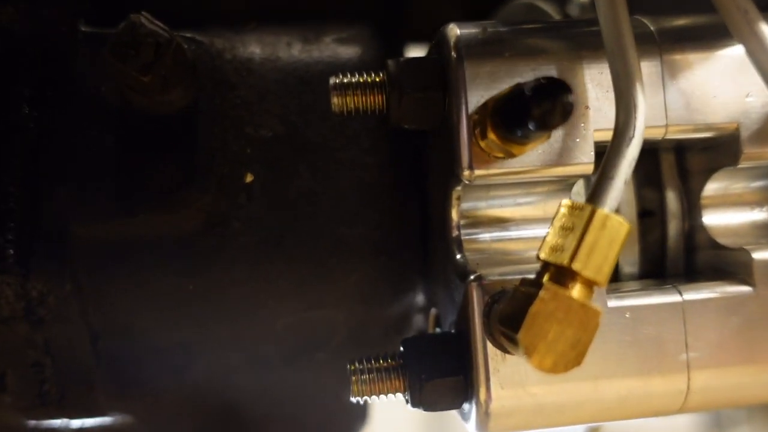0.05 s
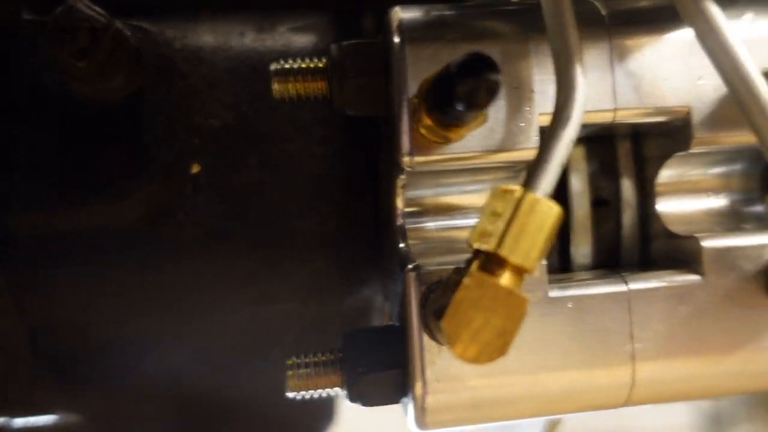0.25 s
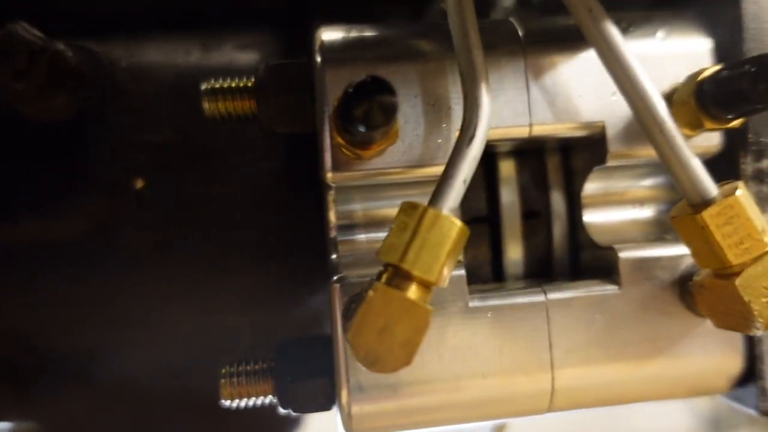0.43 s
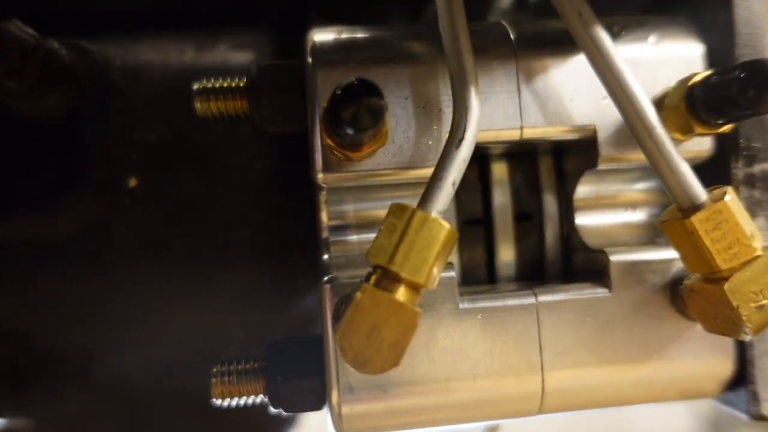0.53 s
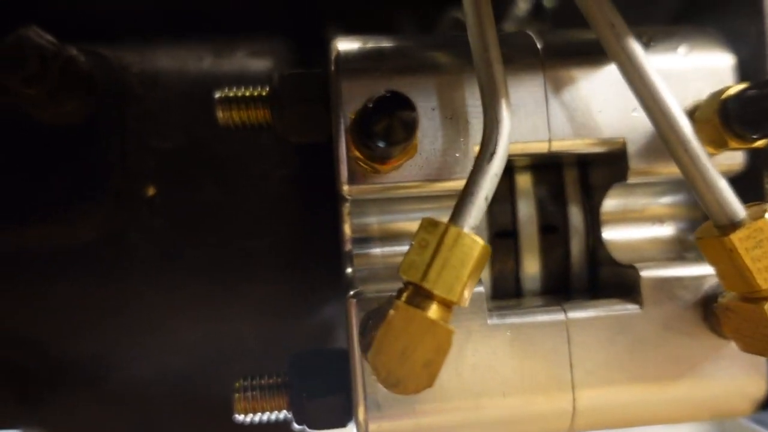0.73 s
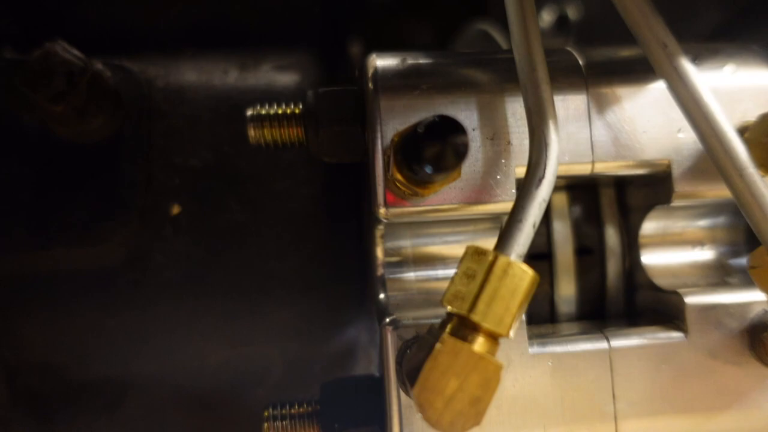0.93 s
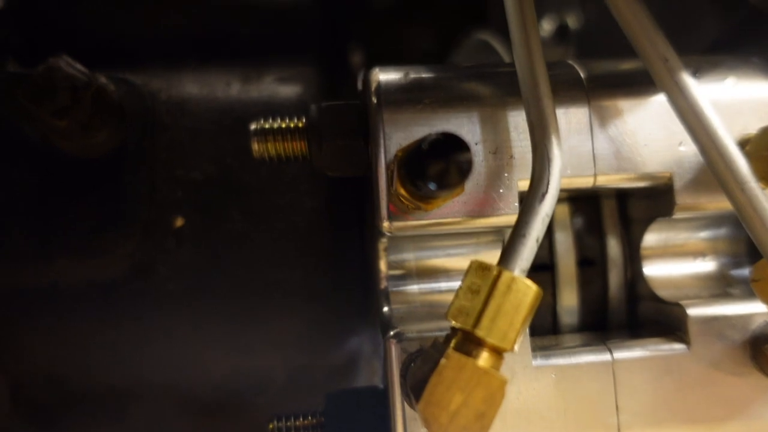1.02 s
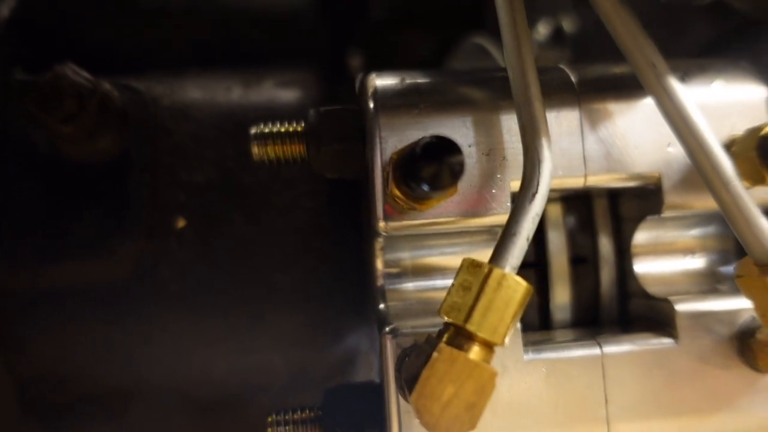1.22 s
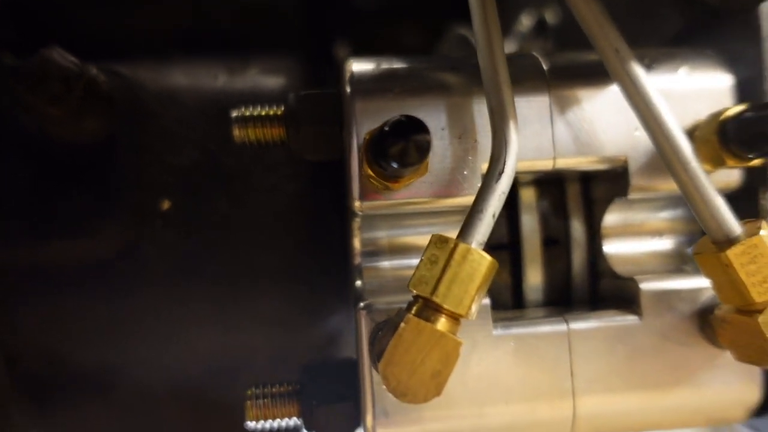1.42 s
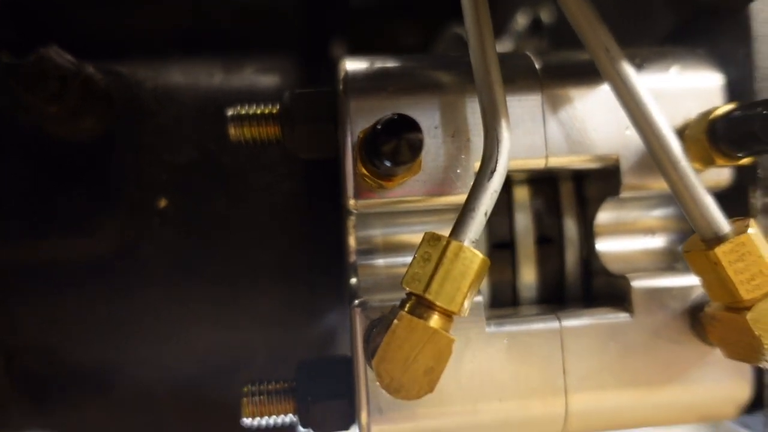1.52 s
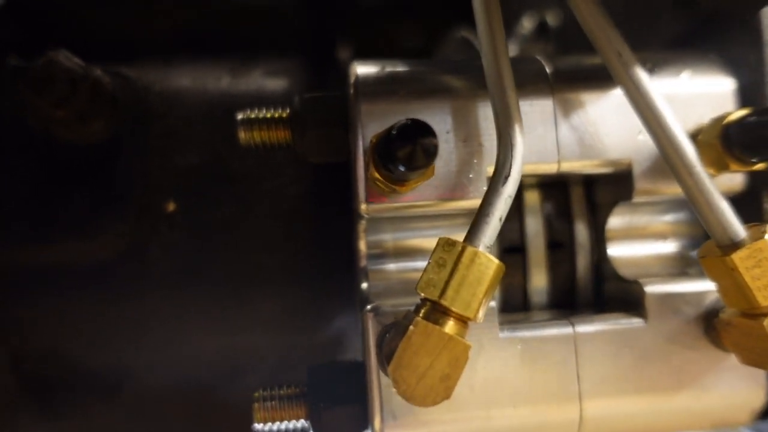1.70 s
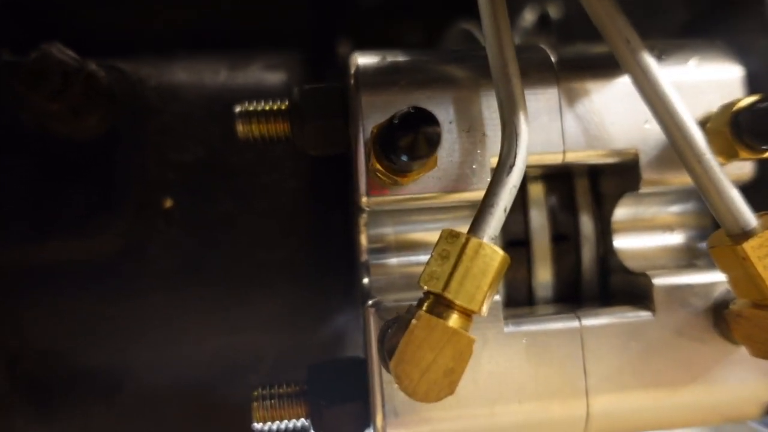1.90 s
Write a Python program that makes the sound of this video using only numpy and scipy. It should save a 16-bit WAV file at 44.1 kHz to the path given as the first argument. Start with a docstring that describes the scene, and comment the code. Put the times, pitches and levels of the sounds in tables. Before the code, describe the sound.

Close to the caliper, a disc brake grips and lets go twice. The pads clack on with a brief metallic ring, then release with a bright click, another clack and soft knocks, over faint workshop air.

```python
"""A disc brake is worked twice in a workshop, heard close to the caliper (the part that holds the pads).
Over quiet air and a thin whine, the pistons slide out with a faint hiss and small ticks.
The pads clack onto the disc and make the metal ring. On letting go a catch snaps,
the mechanism drops back on its stop, the mount shudders and the linkage settles with soft knocks.
The loose pads rattle briefly after this first release; the second round has no rattle."""
import sys
import numpy as np
from scipy import signal
from scipy.fft import rfft, irfft, next_fast_len
from scipy.io import wavfile

SR = 44100
rng = np.random.default_rng(int(sys.argv[2]) if len(sys.argv) > 2 else 0)


def materialize(psi):
    """Save the field psi as 16-bit PCM at rate SR to the path in sys.argv[1].

    A 1-D psi becomes a single channel; in a 2-D psi each row is a channel.
    """
    bounded = np.clip(np.atleast_2d(psi).T, -1, 1)
    quanta = np.round(bounded * 32767).astype(np.int16)
    wavfile.write(sys.argv[1], SR, quanta)


N = 85995

# A "colour" says how strong a noise is at each frequency; "t60" is the time a sound takes to fall 60 dB.
# how alike the two ears hear a noise: f/Hz, likeness (1 = the same)
EAR_LIKENESS = [(300, 0.98), (1000, 0.88), (5000, 0.69)]
# how long the workshop echoes: f/Hz, t60/s
ROOM_DECAY = [(1000, 1), (2500, 0.78), (9000, 0.85), (15000, 0.96)]
# colour of the workshop air: f/Hz, level/dB
AIR_COLOUR = [(25, -46), (100, -35), (193, -31.5), (368, -10.5), (666, -10.5), (848, -8), (1140, -8),
              (1300, -5.5), (1850, -15), (7500, -28), (15500, -56.5)]
# the pistons slide: start/s, end/s, level/dB
PISTON_SLIDES = [(0.087, 0.314, -53), (1.093, 1.193, -54.5), (1.704, 1.742, -55)]
# colour of their hiss: f/Hz, level/dB
HISS_COLOUR = [(400, -14), (900, 7.5), (1850, 6.5), (2500, -4), (3500, -10), (4800, -2), (8000, -18),
               (15000, -51)]
# small ticks of pads and springs: t/s, level/dB, f/Hz
SMALL_TICKS = [(0.16, -46.5, 4160), (0.177, -42.5, 4380), (0.19, -42, 4480), (0.221, -40.5, 4890),
               (0.487, -46, 4600), (0.583, -39.5, 5430), (0.639, -49, 5540), (0.843, -37.5, 1860),
               (1.0953, -46, 4240), (1.115, -51, 4700), (1.123, -44, 5420), (1.4139, -35.5, 2630),
               (1.517, -39, 5270), (1.67, -41.5, 3190)]
# colour of a tiny slip: f/Hz, level/dB
SLIP_COLOUR = [(400, -23), (1500, -2), (5000, 11.5), (8500, 0.5), (10500, -1), (15000, -18)]
# the pads meet the disc: t/s, gap between contacts/s, level/dB, noise t60/s, favoured f/Hz
PAD_CLAMPS = [(0.295, 0.0065, -28, 0.077, 1090), (1.2241, 0.0076, -31, 0.17, 1190)]
# each clamp is a dull touch, the hard clack and a last seating blow: level/dB, brightness/Hz
PAD_CONTACTS = [(-1, 5200), (1, 19000), (-3.5, 6900)]
# the modes (natural ringing tones) of caliper and disc: f/Hz, level/dB, t60/s
CALIPER_MODES = [(382, -21, 0.74), (534, -7.5, 0.155), (958, -9, 0.32), (1017, -6, .27), (1177, -13, 0.18),
                 (1355, -9.5, 0.11), (1630, -8, 0.092), (1954, -9.5, 0.15), (2202, -14, 0.16),
                 (2530, -13, 0.075), (2753, -7.5, 0.12), (3210, -8.5, 0.085), (4143, -10, 0.18),
                 (5244, -5, 0.055)]
# colour of the pads' clack: f/Hz, level/dB
PAD_COLOUR = [(200, -13), (400, -7), (750, -5), (1100, 3), (2700, -4), (5400, -6), (7500, -15),
              (10000, -26), (15000, -34.5)]
# soft knocks of the linkage: t/s, level/dB, t60/s, brightness/Hz
LINKAGE_KNOCKS = [(0.4851, -37, 0.062, 7000), (0.74, -42, 0.12, 2500), (0.872, -47, 0.068, 2530),
                  (1.431, -39.5, 0.062, 4950), (1.573, -32.5, 0.076, 610), (1.609, -39.5, 0.099, 550),
                  (1.673, -39, 0.085, 2970), (1.683, -40.5, 0.12, 700)]
# colour of a knock: f/Hz, level/dB
LINKAGE_COLOUR = [(200, -24), (440, 2), (620, -4), (990, -1.5), (1400, -3), (1900, -17), (5500, -11.5),
                  (15000, -64)]
# the catch snaps: t/s, level/dB
CATCH_SNAPS = [(0.5645, -25.5), (1.4983, -25.5)]
# modes of the catch: f/Hz, level/dB, t60/s
CATCH_MODES = [(2540, -4, 0.0035), (2860, -11, 0.0097), (4020, 3, 0.009), (4894, 3.5, 0.02),
               (5100, 6.5, 0.012), (7480, -15.5, 0.043)]
# colour of the snap: f/Hz, level/dB
CATCH_COLOUR = [(300, -17), (1200, 2), (2500, 4), (4800, 2.5), (7500, 0), (10000, -22), (15000, -38)]
# the mechanism lands on its stop: t/s, level/dB, extra level of the ring/dB, brightness/Hz
STOP_LANDINGS = [(0.621, -26, 0.5, 3600), (0.625, -31, 8, 12700), (1.5484, -23.5, -26, 3380),
                 (1.551, -30.5, 9, 11100)]
# modes of the stop, the main one first: f/Hz, level/dB, t60/s
STOP_MODES = [(1262, 2, .068), (978, -15, .055), (1620, -9, .055), (1830, -8, .04), (2132, -12, .05),
              (2480, -11, .03), (2700, -4, .035), (3600, -11, .025), (6740, -30, .05)]
# colour of a landing: f/Hz, level/dB
LANDING_COLOUR = [(200, -34), (350, -18.5), (900, -20.5), (1700, -4.5), (2700, -5), (4000, -13),
                  (6500, -19), (15000, -35.5)]
# the mount shudders: t/s, level/dB
MOUNT_SHUDDERS = [(0.631, -48.5), (1.56, -45)]
# colour of the shudder: f/Hz, level/dB
MOUNT_COLOUR = [(60, -31), (160, -3), (260, -7.5), (380, 10), (600, -11), (4000, -40)]
# the loosened pads rattle: t/s, level/dB, t60/s
PAD_RATTLES = [(0.637, -34, 0.15)]

LOW_CUT_HZ, TOP_HZ = 284, 15750  # the bass stays weak below the first; the top of the sound's range
PAD_ECHO_DB = -4.5


def amp(db):
    """Turn decibels into a number to multiply by."""
    return 10 ** (np.asarray(db) / 20)


def along(points, hz):
    """Read between the rows of a (frequency, value) table, on a log frequency axis."""
    freqs, values = np.transpose(points)
    return np.interp(np.log(hz + 1), np.log(freqs + 1), values)


def filtered(x, response):
    """Scale each frequency in x by response(hz)."""
    size = next_fast_len(N + 8192)
    return irfft(rfft(x, size) * response(np.fft.rfftfreq(size, 1 / SR)), size)[..., :N]


def softened(x, hz):
    """A softer contact loses the treble above hz, its brightness."""
    return filtered(x, lambda f: 1 / (1 + np.sqrt(2) * 1j * f / hz - (f / hz) ** 2))


def thinned(x):
    """Weaken the bass below LOW_CUT_HZ."""
    return signal.sosfilt(signal.butter(2, LOW_CUT_HZ, "high", fs=SR, output="sos"), x)


def noise(colour):
    """Coloured stereo noise of strength (rms) 1, nearly the same in both ears in the bass."""
    def response(hz):
        spread = np.arccos(np.clip(along(EAR_LIKENESS, hz), -1, 1)) / 2
        return amp(along(colour, hz)) * [np.cos(spread), np.sin(spread)]
    mid, side = filtered(rng.standard_normal((2, N)), response)
    pair = np.array([mid + side, mid - side])
    return pair / pair.std()


def since(s):
    """Seconds since time s, zero before it."""
    return np.maximum(np.arange(N) / SR - s, 0)


def fade(t, t60, rise=0.00029):
    """A level that rises from zero, then dies away; all times are in seconds."""
    return np.exp(-np.log(1000) * t / t60) * (1 - np.exp(-t / rise))


def wander():
    """A random drift of phase, about 2.5 radians after one second, that makes a tone unsteady."""
    return 2.5 * np.cumsum(rng.standard_normal(N)) / np.sqrt(SR)


def ring(t, modes, rise=0, scatter_db=2, build_cycles=3.4):
    """Struck modes build up over a few cycles and fade; the loose contact detunes them at random."""
    out = 0
    for hz, db, t60 in modes:
        phase = 2 * np.pi * (hz * t + rng.random()) + wander()
        strength = amp(db + scatter_db * rng.standard_normal())  # no two blows are alike
        out = out + strength * fade(t, t60, rise + build_cycles / hz) * np.sin(phase)
    return out


def placed(x, pan_db, echo_db, near=0):
    """Add the room's echo of x and an echo-free ring (near), then thin the bass; pan_db > 0 is left."""
    hz, t, spectrum = signal.stft(noise([(SR, 0)])[:, :SR], SR, nperseg=256)  # white noise
    decay = fade(t, along(ROOM_DECAY, hz)[:, None], rise=0.0022)
    tail = signal.istft(spectrum * decay, SR, nperseg=256)[1]
    echo = signal.fftconvolve(x.mean(0)[None], tail / np.linalg.norm(tail[0]), axes=1)[:, :N]
    direct = (x + near) * amp([[pan_db / 2], [-pan_db / 2]])
    return thinned(direct + amp(echo_db) * echo)


def air(db=-56):
    """The quiet, even rush of the workshop air."""
    return amp(db) * noise(AIR_COLOUR)


def whine(hz=846, db=-67):
    """A thin, slightly unsteady tone in the background."""
    return amp(db) * np.sqrt(2) * np.sin(2 * np.pi * hz * since(0) + wander())


def slides(rise_s=0.0011, fall_s=0.041, slips_per_s=130, crackle_db=-13):
    """The pistons hiss while they travel, with a fine crackle of tiny slips."""
    level = sum(amp(db) * (1 - np.exp(-since(start) / rise_s)) * np.exp(-since(end) / fall_s)
                for start, end, db in PISTON_SLIDES)
    slips = (rng.random(N) < slips_per_s / SR) * rng.uniform(.5, 1, N)
    grains = signal.fftconvolve(slips, fade(since(0), t60=0.006))[:N]
    crackle = amp(crackle_db) * grains / grains.std() * noise(SLIP_COLOUR)
    return thinned(level * (noise(HISS_COLOUR) + crackle))


def ticks(ping_t60=0.03):
    """Pads and springs slip a little, each time with a puff and a short ping; lower ticks are duller."""
    puff = ping = 0
    for s, db, hz in SMALL_TICKS:
        t = since(s)
        ping = ping + amp(db) * ring(t, [(hz, 0, ping_t60)])
        puff = puff + amp(db) * softened(noise(SLIP_COLOUR) * fade(t, t60=0.02), 1.2 * hz)
    return placed(puff, pan_db=1.5, echo_db=3.5, near=ping)


def clamps(ring_db=-3, lift_db=8, reach_octaves=0.039):
    """The pads meet the disc in three quick contacts; where they land decides which modes ring most."""
    clack = tone = 0
    for s, gap, db, t60, favoured_hz in PAD_CLAMPS:
        modes = []
        for hz, mode_db, mode_t60 in CALIPER_MODES:
            closeness = np.exp(-(np.log2(hz / favoured_hz) / reach_octaves) ** 2)
            modes.append((hz, mode_db + lift_db * closeness, mode_t60))
        for k, (contact_db, bright_hz) in enumerate(PAD_CONTACTS):
            t = since(s + k * gap)
            burst = noise(PAD_COLOUR) * fade(t, t60, rise=0.00054)
            clack = clack + amp(db + contact_db) * softened(burst, bright_hz)
            tone = tone + amp(db + contact_db + ring_db) * softened(ring(t, modes), bright_hz)
    return thinned(placed(clack, pan_db=1.5, echo_db=PAD_ECHO_DB, near=tone))


def knocks():
    """The linkage settles with dull knocks, each a short burst of noise."""
    out = 0
    for s, db, t60, bright_hz in LINKAGE_KNOCKS:
        burst = noise(LINKAGE_COLOUR) * fade(since(s), t60, rise=0.001)
        out = out + amp(db) * softened(burst, bright_hz)
    return placed(out, pan_db=1.5, echo_db=-11)


def snaps(crack_db=-9.5, hum_delay_s=0.012):
    """The catch lets go with a hard, bright click; the stop's main mode hums in answer."""
    crack = tone = 0
    for s, db in CATCH_SNAPS:
        t = since(s)
        click = sum(amp(mode_db) * fade(t, t60) * np.sin(2 * np.pi * hz * t)
                    for hz, mode_db, t60 in CATCH_MODES)
        crack = crack + amp(db + crack_db) * noise(CATCH_COLOUR) * fade(t, t60=0.048)
        hum = ring(since(s + hum_delay_s), STOP_MODES[:1], rise=0.013)
        tone = tone + amp(db) * (click + hum)
    return placed(crack, pan_db=1.0, echo_db=-3, near=tone)


def landings():
    """The mechanism drops on its stop: a dull touch, then a brighter blow that rings it more."""
    clack = tone = 0
    for s, db, ring_db, bright_hz in STOP_LANDINGS:
        t = since(s)
        clack = clack + amp(db) * softened(noise(LANDING_COLOUR) * fade(t, t60=0.049), bright_hz)
        tone = tone + amp(db + ring_db) * ring(t, STOP_MODES, rise=0.0057)
    return placed(clack, pan_db=1.3, echo_db=-15, near=tone)


def shudders():
    """The mount shakes after each release, making a low swell of noise."""
    return sum(amp(db) * noise(MOUNT_COLOUR) * fade(since(s), t60=0.84, rise=0.1)
               for s, db in MOUNT_SHUDDERS)


def rattles():
    """After the first release the loose pads chatter in the caliper, heard as one burst of noise."""
    out = sum(amp(db) * noise(PAD_COLOUR) * fade(since(s), t60, rise=0.0039)
              for s, db, t60 in PAD_RATTLES)
    return placed(out, pan_db=-1.5, echo_db=PAD_ECHO_DB)


def scene():
    """The brake grips and lets go over the quiet background of the workshop."""
    loud_blows = clamps() + snaps() + landings()
    small_sounds = rattles() + knocks() + ticks() + slides() + shudders()
    return loud_blows + small_sounds + whine() + air()


def record(dry):
    """Cut away all treble above TOP_HZ."""
    return filtered(dry, lambda hz: hz < TOP_HZ)


dry = scene()
out = record(dry)
materialize(out)
```